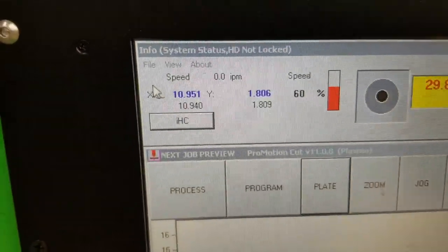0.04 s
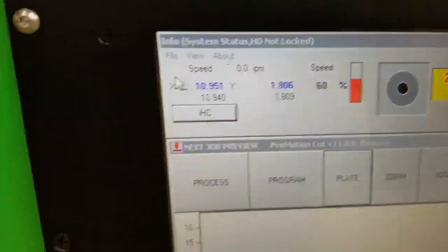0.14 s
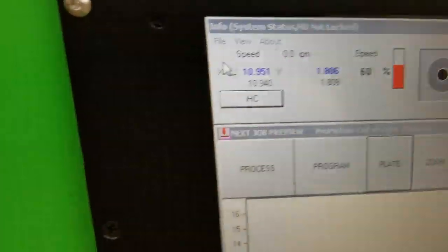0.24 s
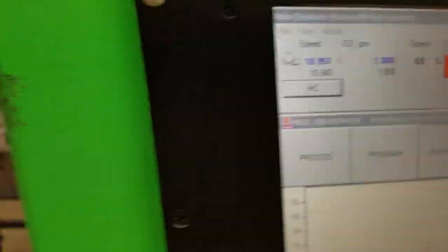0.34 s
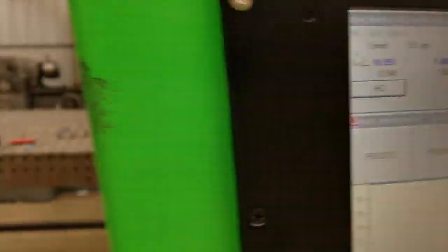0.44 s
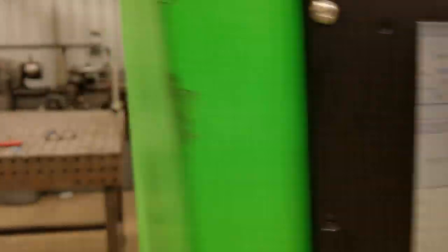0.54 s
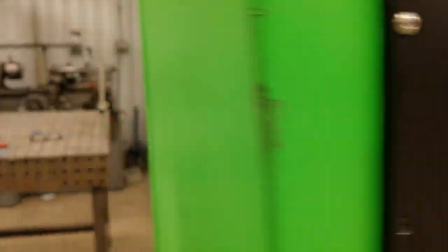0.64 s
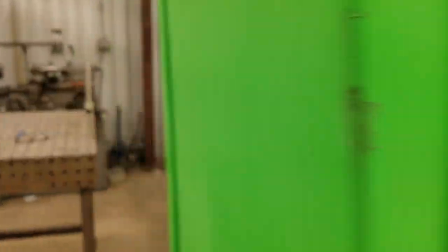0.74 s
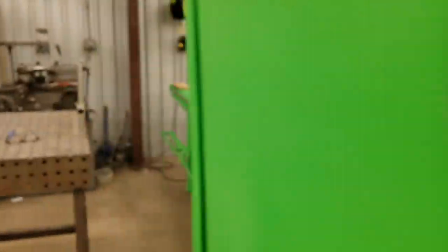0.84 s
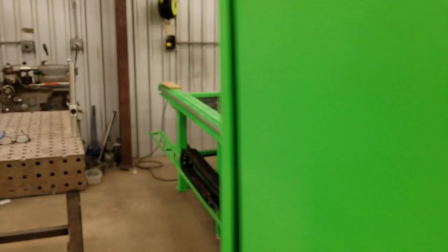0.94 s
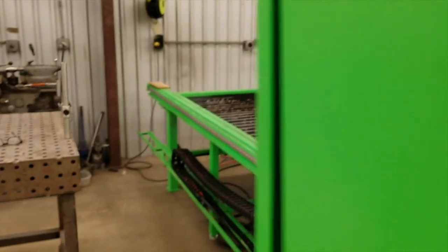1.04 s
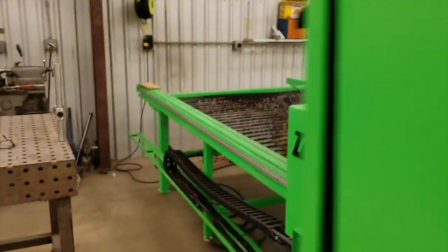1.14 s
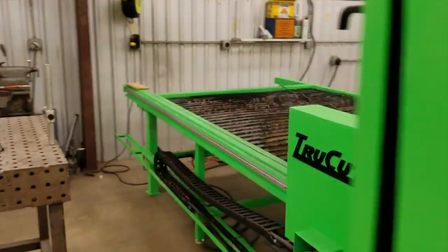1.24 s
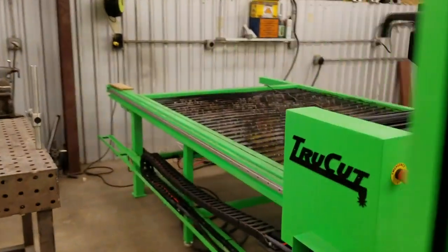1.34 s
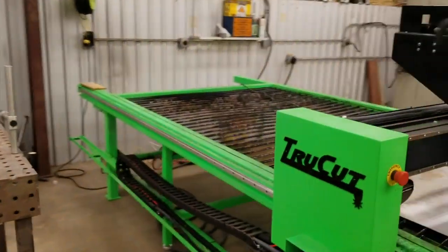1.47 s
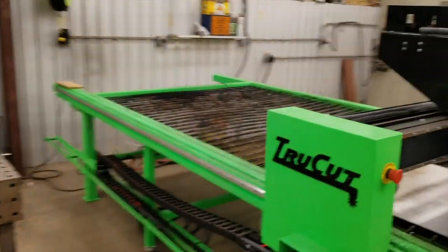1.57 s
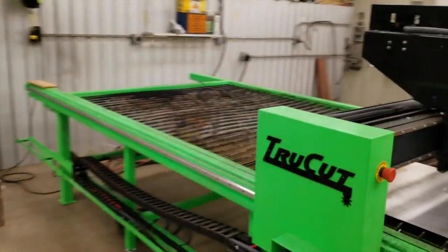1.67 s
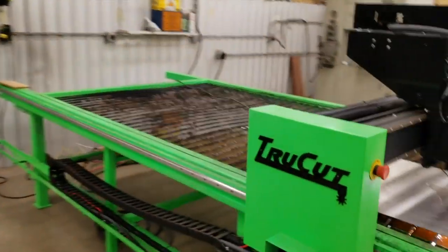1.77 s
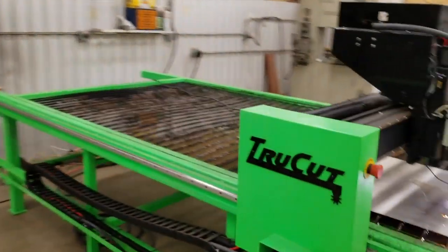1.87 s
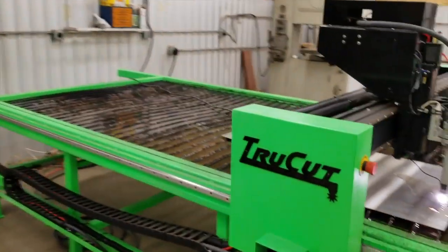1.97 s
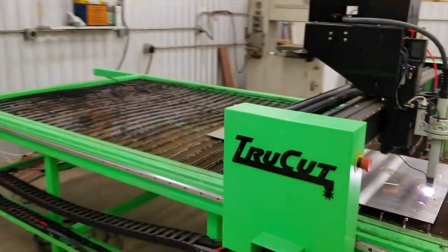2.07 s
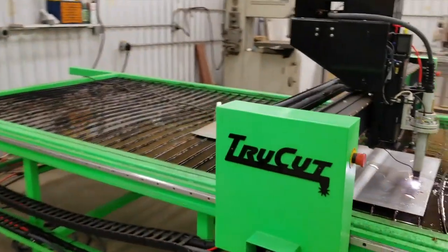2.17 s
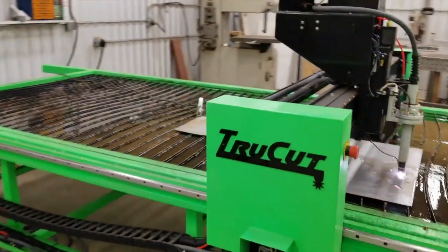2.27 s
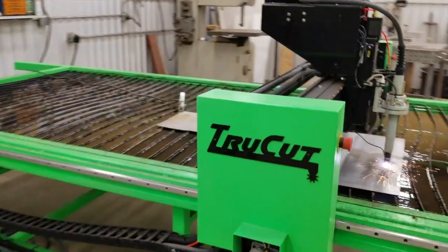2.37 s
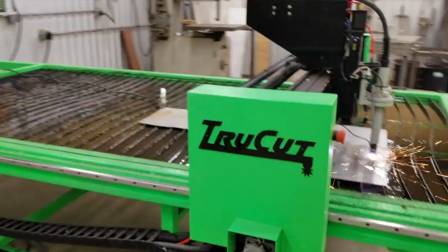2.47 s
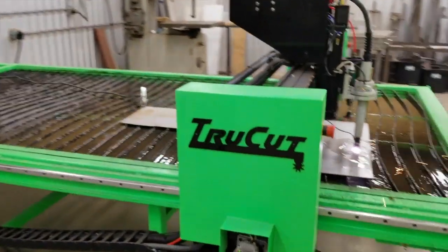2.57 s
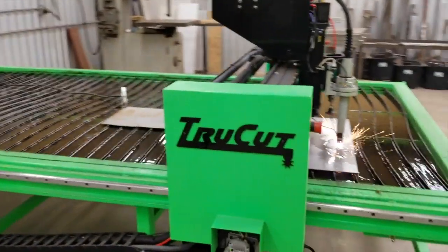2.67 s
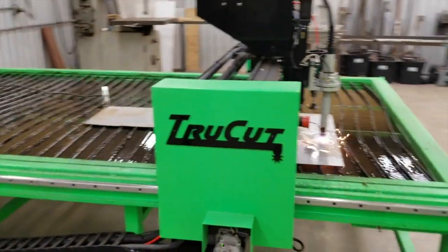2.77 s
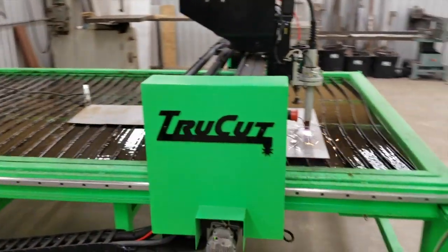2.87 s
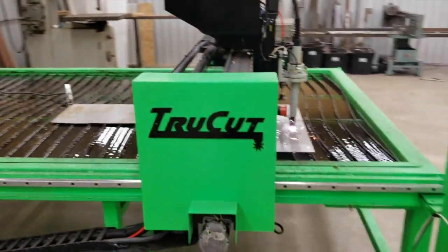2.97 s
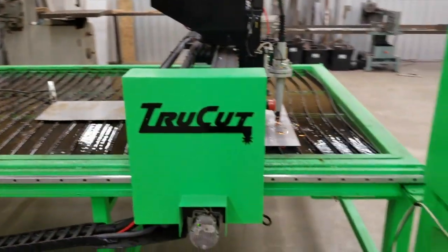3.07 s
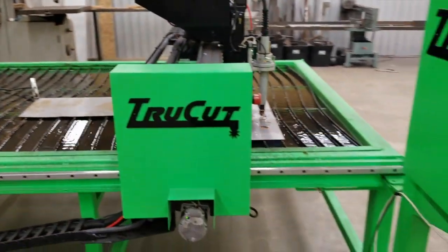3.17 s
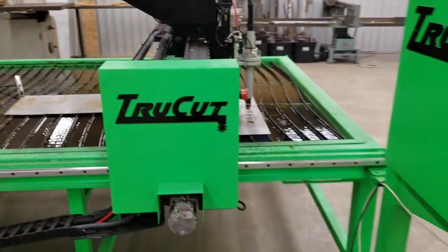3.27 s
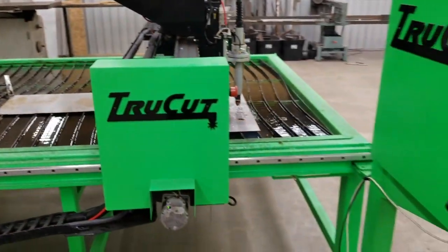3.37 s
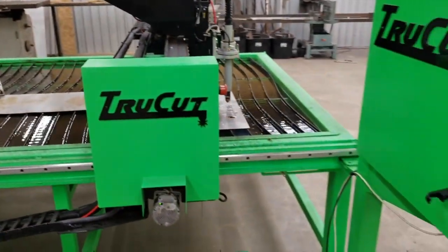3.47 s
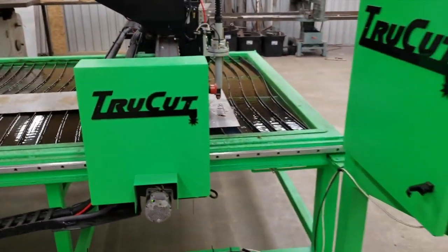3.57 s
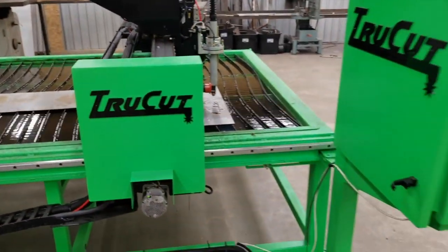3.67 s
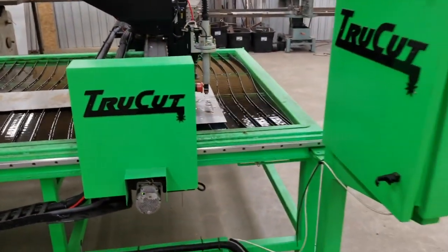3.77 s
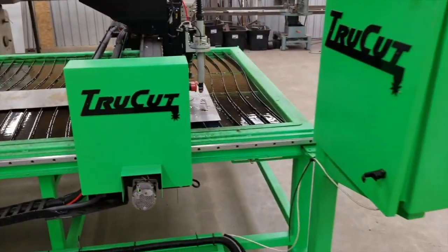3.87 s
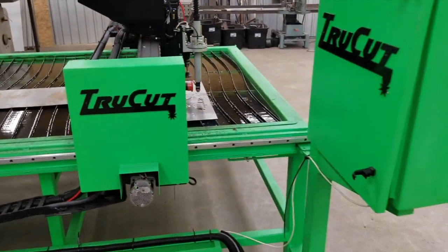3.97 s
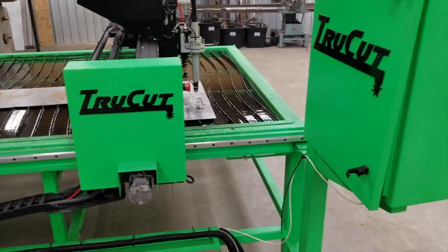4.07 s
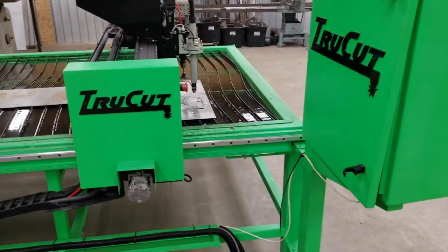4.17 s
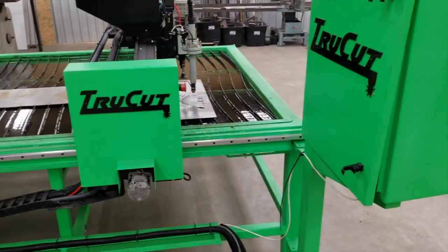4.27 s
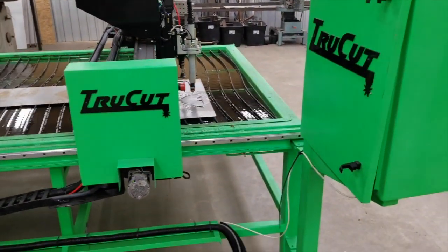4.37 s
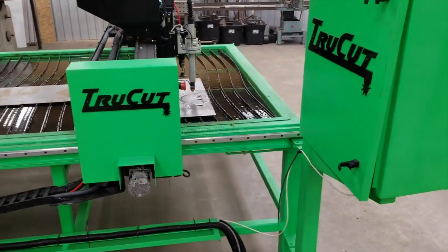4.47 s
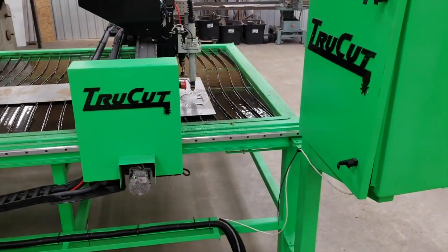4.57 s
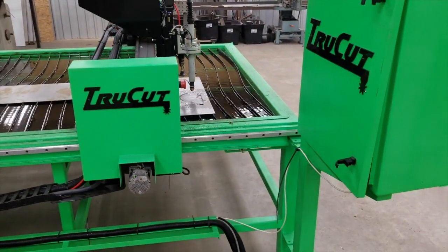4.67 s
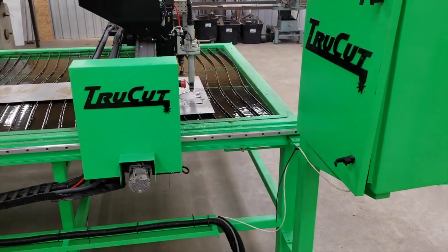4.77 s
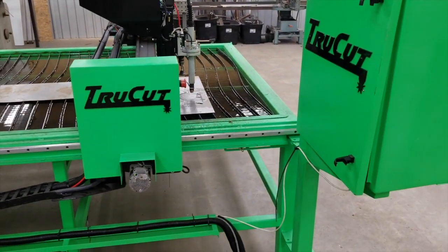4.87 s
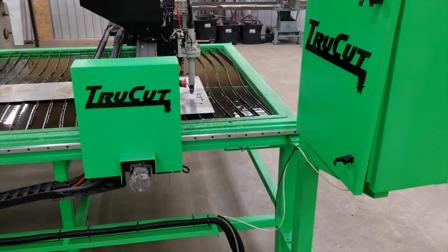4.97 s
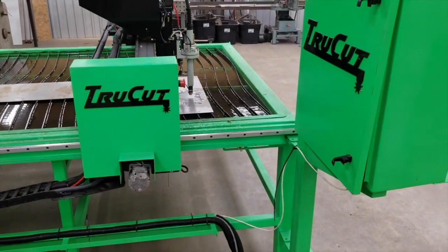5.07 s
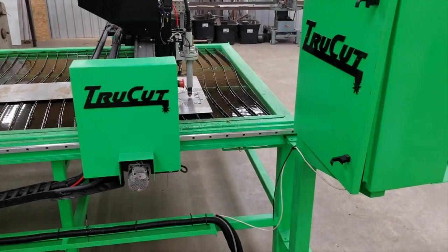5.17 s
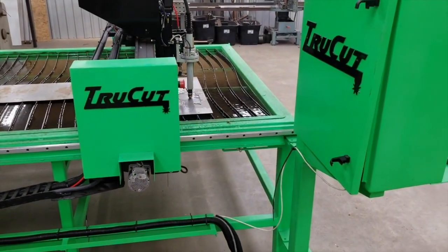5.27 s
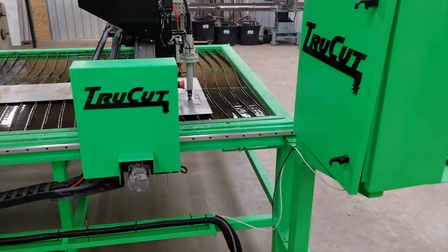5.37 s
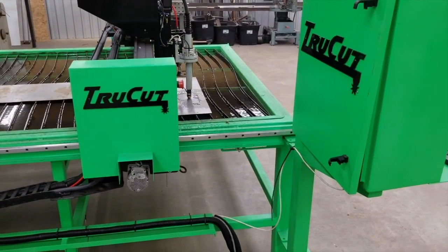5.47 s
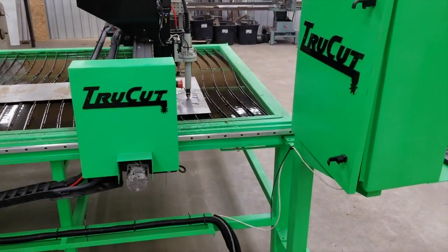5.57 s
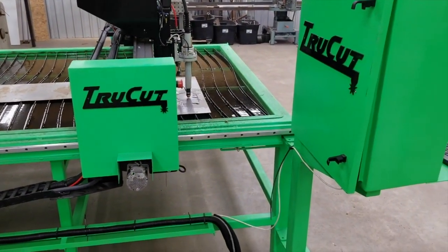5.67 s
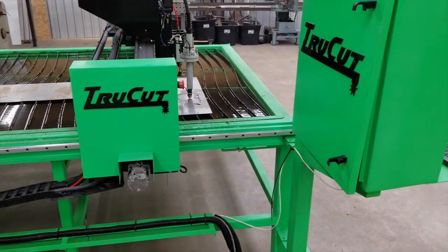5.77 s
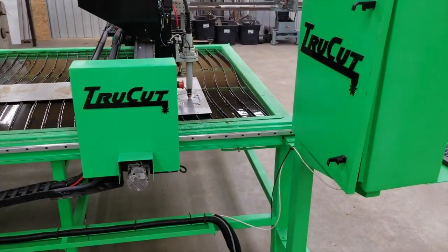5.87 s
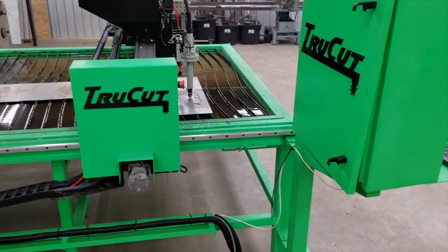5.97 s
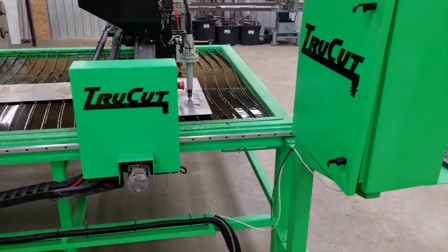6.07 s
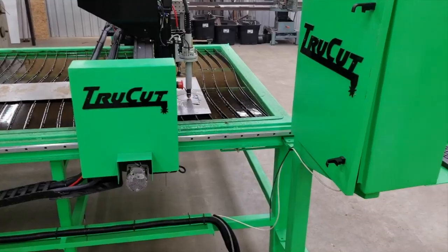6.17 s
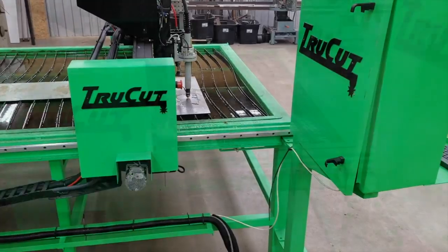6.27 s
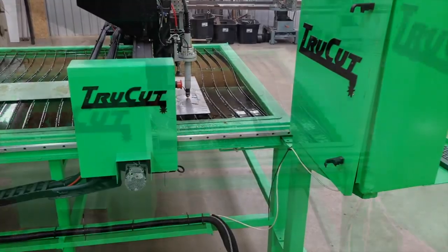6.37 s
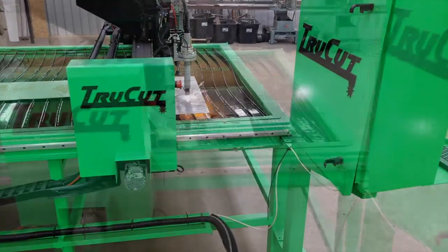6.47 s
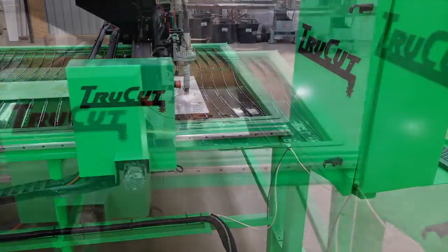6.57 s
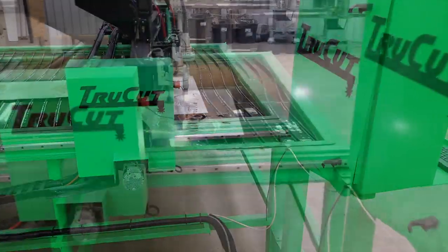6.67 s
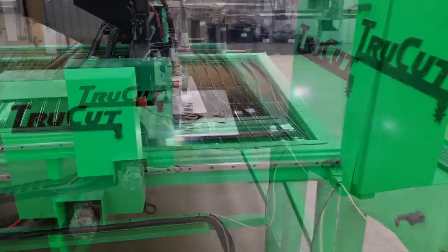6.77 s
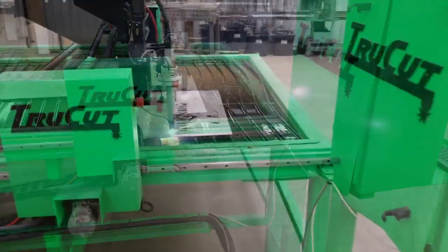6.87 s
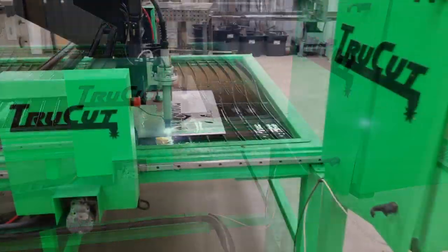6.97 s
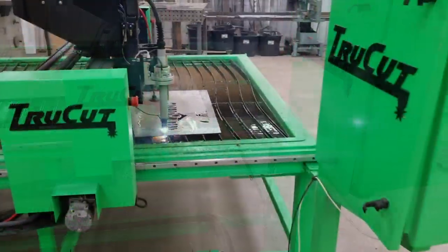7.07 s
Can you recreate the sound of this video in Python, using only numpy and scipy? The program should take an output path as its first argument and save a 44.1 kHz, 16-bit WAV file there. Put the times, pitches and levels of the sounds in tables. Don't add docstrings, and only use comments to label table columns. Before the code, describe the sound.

A handheld stereo microphone turns towards a cutting table a few metres off in a reflective metal shop. Torch hiss fades out, leaving humming fans; a brief gas puff and light snap restart it. Molten metal bursts into the water tray in rough surges, then the jet smooths out. After a second quick fade and pause, gas spurts and a hard double crack begins another sputtering rush.

```python
import sys
import numpy as np
from scipy import signal
from scipy.io import wavfile
from scipy.ndimage import uniform_filter1d, minimum_filter1d, map_coordinates

SR = 44100
rng = np.random.default_rng(int(sys.argv[2]) if len(sys.argv) > 2 else 0)


def ratio(d):
    e = np.asarray(d, float) / 20
    return 10 ** e


def digitize_waveform(pressure):
    field = np.atleast_2d(pressure).T
    bounded = np.clip(field, -1, 1)
    quanta = np.round(bounded * 32767).astype(np.int16)
    wavfile.write(sys.argv[1], SR, quanta)


N = 314414

# [from f/Hz, to f/Hz]
LAYER_SPANS = [
    (170, 430),
    (430, 950),
    (950, 2500),
    (2500, 4400),
    (4400, 6200),
    (6200, 9800),
    (9800, 16000),
]
# [t/s, splutter level/dB]
SPLUTTER = [(0, 0), (1.68, -0.5), (1.75, 1.5), (2.0, 1.5), (2.15, 2.5), (3.1, 2), (3.4, 0.9), (5.7, 0.83),
            (5.76, 0.7), (6.41, -1), (6.45, 1.5), (7.13, 1)]
# [t/s, level/dB]
BEAM = [(0, -1), (.5, 1.5), (.85, 3), (1.25, -9), (1.55, 0), (1.7, 5), (2.05, 2), (2.25, -3), (2.6, 3.5),
        (3.1, -3), (3.4, 0.5), (4.0, 1.5), (4.5, 4), (4.85, 1), (5.2, -1), (5.6, 4.5), (6.05, -10),
        (6.35, 2), (6.55, -3), (7.13, 4)]
# [f/Hz, left minus right level/dB]
PORT_LEAN = [(60, 0.0), (150, 0.5), (380, 0), (950, -0.5), (2380, -0.5), (5980, 0.5), (15000, -1.5)]


def torch():
    lifts = []
    for level, span in zip(layer_levels(), LAYER_SPANS):
        lifts.append(level - decibels(np.sum(ratio(torch_density(np.arange(*span))) ** 2)))
    centres = np.log(np.prod(LAYER_SPANS, axis=1)) / 2
    direct, walls, straight, around = arrivals()
    splutter_db, = in_time(SPLUTTER)
    beam_db, = in_time(BEAM)
    whole, near = puffs(per_s=49, fade_s=0.024), drift(16)
    out, edges = 0, 150 * 2 ** np.arange(0, 7, 1 / 4)
    for k, (low, high) in enumerate(zip(edges, edges[1:])):
        hz = np.sqrt(low * high)
        place = np.interp(np.log(hz), centres, np.arange(len(LAYER_SPANS)))
        below = min(int(place), len(LAYER_SPANS) - 2)
        lift = lifts[below] + (place - below) * (lifts[below + 1] - lifts[below])
        near = 0.8 * near + 0.24 * drift(61)
        from_jet = int(hz > 2400)
        path = from_jet + int(hz >= 6000)
        noise = straight[path] * direct[path][k % 2]
        noise = noise + around[path] * diffuse(walls[k % 2][from_jet], hz)
        level = torch_density(hz) + lift + splutter_db * (0.85 * whole + 2.0 * near)
        level = level + (hz > 13500) * beam_db
        out = out + band(noise, low, high) * ratio(level) * left_right(at_hz(PORT_LEAN, hz))
    out = tints(cavities(turning(out)))
    return gouts(slops(out)) * np.sqrt(SR / 2) * ratio(1.15)


# [t/s, hiss level/dB]
JET = [
    [(0, -25), (.45, -25.5), (1.04, -26.5)],
    [(1.69, -24), (2.2, -24), (2.3, -21), (2.37, -19.5), (2.53, -17.5), (2.63, -23.5), (3.05, -28),
     (3.6, -32), (3.82, -28.5), (4.9, -24), (5.0, -26), (5.74, -25)],
    [(6.424, -22), (6.626, -28), (7.13, -25.5)],
]
# [t/s, roar level/dB, blow-through into the tray level/dB]
CUT = [
    [(0, -24, -15), (1.04, -37, -15.5)],
    [(1.69, -30, -21), (1.85, -23, -20), (1.9, -28.5, -6), (2.3, -29.5, -2), (2.4, -25, -13.5),
     (2.8, -29, -10), (3.05, -41, -3.5), (3.2, -36, -17.5), (3.94, -24.5, -12.5), (4.34, -31.5, -18.5),
     (4.8, -35, -8), (5.74, -35.5, -15)],
    [(6.424, -27.5, -19.5), (6.6, -26, -22), (6.7, -30, -6), (7.13, -27.5, -15)],
]
# [level/dB re its control, share of jet 0-1, share of blow-through, share of the fall, pre-
# flow level/dB re the common pre-flow ramp]
VOICING = [
    (-15, 0.36, 0.6, 0.52, -30),
    (-0.36, 0, 1, 0.15, -13.5),
    (-3, 0, 0.16, 0.79, -20),
    (-3.5, 0.2, -0.071, 0.47, -13.5),
    (-4, 0.69, -0.084, 0.73, -5.5),
    (-4, 0.97, -0.082, 0.8, -4.5),
    (1.86, 0.94, -0.0018, 1.1, -4.5),
]
# [gas shut t/s, gas reopened t/s, arc struck t/s, blast level/dB]
VALVES = [
    (1.037, 1.563, 1.687, -4.5),
    (5.741, 6.297, 6.4243, 5),
]


def layer_levels():
    fall_db_per_s, fall_db_per_s2 = 35.5, 69
    preflow_start_db, preflow_db_per_s, open_s = -44, 108, .012
    arc_out_db, arc_out_s = 2, 0.049
    blast_s = 0.016
    t = np.arange(N) / SR
    jet, = in_time(np.vstack(JET))
    roar, through = in_time(np.vstack(CUT))
    levels = []
    for db, jet_share, through_share, fall_share, preflow_db in VOICING:
        level = db + jet_share * jet + (1 - jet_share) * roar + through_share * through
        for shut, opened, struck, blast_db in VALVES:
            off = slice(round(shut * SR), round(struck * SR))
            since, flowing = t[off] - shut, t[off] - opened
            dying = level[off.start] - fall_share * (fall_db_per_s * since + fall_db_per_s2 * since ** 2)
            dying -= (1 - jet_share) * arc_out_db * (1 - np.exp(-since / arc_out_s))
            preflow = ratio(preflow_start_db + preflow_db + preflow_db_per_s * flowing)
            preflow = preflow * np.clip(flowing / open_s, 0, 1)
            level[off] = decibels(ratio(dying) ** 2 + preflow ** 2)
            level[off.stop:] += jet_share * blast_db * np.exp((struck - t[off.stop:]) / blast_s)
        levels.append(level)
    return levels


# [f/Hz, density level/dB per Hz]
TORCH_HISS = [(94, -64), (160, -34), (653, -9), (924, -11.5), (1410, -1.5), (1580, -6), (1880, -2.5),
              (2470, -1.5), (3490, 2), (6470, -8), (8000, -4.5), (9150, -2.5), (11100, -2), (13200, 5),
              (16000, -7)]
# [f/Hz, density level/dB per Hz]
BOIL = [(71, -57), (120, -36), (227, -14.5), (297, -11.5), (374, -8), (439, -8), (628, 3), (1300, 3),
        (1690, -40), (2860, -120)]


def torch_density(hz):
    boil = at_hz(BOIL, hz) + at_hz(TORCH_HISS, 1000) - at_hz(BOIL, 1000)
    return np.where(hz < 1000, boil, at_hz(TORCH_HISS, hz))


def puffs(per_s, fade_s):
    blown = (rng.random(N) < per_s / SR) * rng.exponential(1, N)
    fade, rise = np.exp(-1 / (fade_s * SR)), np.exp(-1 / (0.021 * SR))
    shape = np.sqrt(signal.lfilter([1], np.convolve([1, -fade], [1, -rise]), blown))
    return rms_one(shape - np.mean(shape))


# [t/s, right lag of the cut/ms, right lag of the jet/ms, direct share of cut 0-1,
# direct share of jet 0-1]
AIM = [(0, -.45, -.34, .65, .22), (.7, -.34, -.3, .5, .15), (1.2, .07, -.15, .2, .05),
       (1.68, -.16, -.18, .65, .38), (2.12, -.15, -.17, .55, .36), (2.24, -.1, -.02, .55, .1),
       (2.37, -.02, .115, .6, .6), (2.58, -.03, .185, .55, .55), (2.66, -.05, .2, .35, .2),
       (3.3, .02, .175, .6, .45), (3.8, .03, .18, .55, .3), (4.3, .02, .1, .65, .4), (5.1, 0, .07, .6, .5),
       (5.6, 0, .09, .55, .3), (6.0, .36, .17, .4, .1), (6.4, .36, .17, .4, .1),
       (6.43, .02, .052, .55, .45), (7.13, .02, .05, .25, .4)]


def arrivals():
    cut_lag, jet_lag, cut_share, jet_share = in_time(AIM)
    shares = np.clip([cut_share, (cut_share + jet_share) / 2, 0.73 * jet_share], 0, 1)
    sources = rng.standard_normal((2, N))
    from_cut = [at_ports(mono, cut_lag) for mono in sources]
    from_jet = [at_ports(mono, jet_lag) for mono in sources]
    facing = np.clip((np.arange(N) / SR - 3.0) * 10, 0, 1)
    body = [jet + facing * (cut - jet) for cut, jet in zip(from_cut, from_jet)]
    walls = [echoes(mono, spread_s=.006) for mono in sources]
    return [from_cut, body, from_jet], walls, np.sqrt(shares), np.sqrt(1 - shares)


STANDS = [.5, 1.9, 2.5, 3.1, 4.6, 6.7]


def echoes(mono, spread_s):
    cut_near, jet_near = .87, .76
    out, t = np.zeros((2, N)), np.arange(N) / SR
    for k in range(len(STANDS)):
        pattern = np.zeros((2, 2000))
        lags = np.minimum(20 + rng.exponential(spread_s * SR, (2, 14)), 1999).astype(int)
        np.put_along_axis(pattern, lags, rng.standard_normal(lags.shape), axis=1)
        pattern /= np.linalg.norm(pattern, axis=1, keepdims=True)
        here = np.sqrt(np.interp(t, STANDS, np.arange(len(STANDS)) == k))
        span = slice(*np.flatnonzero(here)[[0, -1]])
        heard = signal.oaconvolve(mono[None, span], pattern)[:, :span.stop - span.start]
        out[:, span] += here[span] * heard
    wash = rng.standard_normal((2, N))
    return [np.sqrt(share) * out + np.sqrt(1 - share) * wash for share in (cut_near, jet_near)]


# [t/s, left minus right level/dB]
TURN = [(0, -0.5), (1.0, .6), (1.8, 1), (2.4, 0.5), (3.1, -0.5), (4.0, 0.3), (5.0, -0.2), (6.2, -0.8),
        (7.13, 0)]


def turning(x):
    return x * left_right(in_time(TURN)[0])


# [from t/s, to t/s, f/Hz, width f/Hz, lift level/dB]
CAVITIES = [(-.1, 0.6, 1780, 135, 7), (1.9, 2.33, 245, 230, 4.5), (-.1, 1.26, 371, 37, 11.5),
            (1.88, 2.73, 640, 82, 4), (2.55, 3.1, 990, 34, 6.5), (3.54, 3.85, 1850, 210, 7.5),
            (3.72, 4.12, 1080, 54, 2.5), (3.8, 4.08, 2460, 31, 9), (3.2, 3.7, 5020, 620, 4),
            (4.5, 5.85, 5340, 432, -1), (3.9, 4.3, 1590, 270, 0), (6.42, 6.5, 5500, 380, 6),
            (5.5, 6.7, 11140, 410, 5), (5, 6.4, 254, 53, 5), (5.2, 5.8, 2480, 120, -1.5),
            (6.41, 6.56, 11000, 300, 7), (2.84, 3.4, 260, 220, 5), (6.65, 6.83, 470, 130, 6.5),
            (4.2, 4.4, 235, 33, 15), (5.0, 5.7, 384, 46, 6), (6.5, 7.0, 1107, 45, 10),
            (6.95, 7.2, 740, 260, 5), (2.0, 2.45, 6500, 140, -9), (1.69, 2.3, 13100, 4800, -3.5)]


def cavities(x):
    out = x.copy()
    for start, end, hz, width, db in CAVITIES:
        on, span = passing(start, end, edge_s=0.16)
        out[:, span] += ratio(db + 2.2 * drift(7)[span]) * on * resonance(x[:, span], hz, width)
    return out


# [from t/s, to t/s, f/Hz, width
# f/Hz, change level/dB]
TINTS = [(.4, 0.85, 2740, 850, -3.5), (.8, 1.1, 1700, 820, 5), (0, 0.96, 4300, 1700, 2),
         (1.72, 2.13, 4600, 1000, -7.5), (1.7, 2.03, 12200, 3300, -4.5), (1.9, 2.21, 5100, 1800, 4.5),
         (2.3, 2.68, 1360, 850, -6.5), (2.78, 2.86, 2000, 860, 5.5), (2.88, 3.05, 2100, 700, 4),
         (2.7, 3.0, 10300, 4000, 2.5), (3.2, 3.5, 8400, 2100, 4.5), (3.5, 8.7, 4330, 330, 1),
         (4.15, 4.7, 2630, 1700, -3.5), (3.7, 3.9, 7000, 3000, 0), (4, 5.7, 630, 340, -1.5),
         (4.3, 4.9, 1170, 330, 5), (4.92, 5.5, 11000, 1300, 4.5), (5.05, 5.55, 5500, 1300, -2.5),
         (5.3, 6.4, 1130, 790, -3), (5.85, 6.15, 5700, 3000, 3), (6.15, 6.3, 2900, 9800, -6.5),
         (1.35, 1.6, 5500, 3500, -4.5), (6.6, 6.7, 3500, 1500, -7.5), (6.85, 7.2, 3300, 610, 2),
         (6.9, 7.2, 4200, 1200, -5.5), (6.5, 7.2, 400, 200, -1), (6.3, 6.6, 9500, 1600, -2.5),
         (1.56, 1.66, 2900, 2500, 0), (6.3, 6.39, 3000, 2500, -1), (1.9, 2.15, 2150, 510, 3),
         (6.58, 6.85, 1030, 310, 4), (3.85, 4.2, 370, 120, -9), (2.3, 2.45, 214, 80, -7),
         (0, 0.56, 520, 190, 3.5), (3.1, 4.1, 290, 74, 4.5), (1.5, 4.2, 1058, 52, 5.5),
         (4.7, 4.9, 14800, 1200, -2), (4.95, 5.27, 6500, 390, -2), (4.4, 4.8, 12500, 1500, -3.5),
          (5.0, 5.45, 11100, 900, 2.5), (4.55, 5.0, 295, 100, 6.5), (2.15, 2.3, 12500, 3000, 0),
          (2.33, 2.42, 13000, 2500, 1), (1.2, 1.5, 1600, 900, -3), (3.45, 3.66, 6000, 600, -11),
          (4.3, 4.85, 3050, 400, -5), (2.68, 3.0, 5900, 540, -5), (0, 0.39, 7300, 900, -4),
          (.55, 0.94, 9600, 900, -5), (3.1, 4.1, 7300, 550, -1), (6.45, 6.68, 9800, 900, -5),
          (6.93, 7.05, 9200, 700, -6), (6.4, 6.7, 14800, 1500, -2.5), (5.7, 6.25, 14500, 2000, -4),
          (1.1, 1.45, 14500, 2000, -6), (4.4, 4.9, 7200, 370, -3), (6.75, 7.2, 6700, 1800, 3),
          (4.5, 6.4, 243, 30, 4), (1.2, 1.7, 900, 60, 4), (5.8, 6.4, 900, 60, 3),
          (3.1, 3.45, 3000, 500, -3.5), (2.62, 2.8, 1800, 700, 2.5), (4.05, 4.3, 7700, 2500, -2.5),
          (.7, 1.3, 1000, 280, 2), (1.9, 2.12, 3100, 600, 2), (2.38, 2.47, 3800, 500, -3),
          (2.47, 2.58, 3000, 500, -4), (4.3, 4.7, 5300, 900, 2), (3.6, 3.9, 1600, 400, 2),
          (0, 1.2, 800, 43, -5), (1.7, 1.95, 8700, 1500, -3), (6.42, 6.5, 3400, 1500, -1)]


def tints(x):
    out = x.copy()
    for start, end, hz, width, db in TINTS:
        on, span = passing(start, end, edge_s=0.095)
        out[:, span] += (ratio(db * on) - 1) * resonance(out[:, span], hz, width)
    return out


# [t/s, colour f/Hz, lift level/dB, whole hiss swell
# (+) or dip (-) level/dB]
SLOPS = [(.93, 360, 11, 2), (1.74, 12200, -7, 1), (1.82, 1970, 5.5, 0.8), (2.06, 227, 8, -5),
         (2.27, 400, 6.5, -2.5), (2.5, 2300, 2, -2), (2.66, 1090, -13, -1), (2.79, 1100, -11, -0.5),
         (2.87, 550, 11.5, 1), (3.04, 380, 13, -2), (2.84, 600, 5, -1), (3.03, 2000, -8, 1),
         (2.11, 6000, -11, 0), (2.06, 1600, 2, 0.5), (3.72, 2450, -7, -1), (3.78, 1180, 0, -1),
         (2.655, 1100, -5, 0), (2.775, 1080, 3.5, -2), (1.95, 790, 1.5, -2), (2.81, 3000, 2, -0.5),
         (2.955, 2480, 1, 0.5), (2.9, 3160, 3.5, -1.5), (2.07, 700, -26, 2.5), (3.66, 1910, -2, -2),
         (3.84, 4650, 1, -0.5), (3.95, 2500, -8, -2), (4.06, 2150, -6, -0.5), (4.11, 3300, -5, -0.5),
         (3.9, 694, 4.5, -0.5), (4.15, 1770, -10, -0.5), (5.04, 11000, -4, -1.5), (5.109, 7100, -5, -3),
         (5.2, 7050, -16, 1.5), (5.34, 7040, -17, 1), (5.42, 6950, -21, -2.5), (5.52, 7000, -19, 0.5),
         (5.59, 7000, -15, -0.5), (5.69, 8000, -1, 2.5), (6.47, 3000, -26, -3.5), (6.55, 1110, -5, -1.5),
         (6.76, 750, 8, 1), (6.95, 700, -11, 1)]


def slops(x):
    return swells(x, SLOPS, half_s=0.041)


# [t/s, colour f/Hz, lift level/dB, whole hiss swell
# (+) or dip (-) level/dB]
GOUTS = [(1.93, 2460, 9, 0), (2.01, 3180, 3, 1), (2.072, 1310, 9.5, 2), (2.167, 3300, 12.5, 1.5),
         (2.245, 2130, 8.5, 0), (2.29, 3000, -21, 0.5), (2.34, 2440, 8, 2.5), (2.372, 13000, 1, 2),
         (2.443, 6000, -20, -0.5), (2.635, 6000, -10, 0.5), (2.045, 3000, -20, -2), (1.84, 9000, -9, 0.5),
         (2.07, 704, -2, 2), (2.66, 1050, 3, 0), (2.83, 900, 0, 0), (6.745, 2510, -4, 0.5),
         (6.69, 3000, -20, -0.5), (6.9, 3000, -20, -1.5), (2.41, 5300, 6, 6), (2.47, 9000, -11, 15),
         (2.522, 4700, 5.5, 0), (2.599, 4950, 7.5, -2.5), (2.69, 1210, -3, 2), (2.741, 3000, -25, -4.5),
         (2.79, 1990, -10, -1), (2.87, 6000, -21, -5), (2.93, 3000, -4, -0.5), (2.98, 6000, -13, 0),
         (3.49, 4800, 1.5, -1.5), (4.018, 1130, 4, -2), (5.05, 3000, -26, -2), (6.52, 4130, -12, 2),
         (6.58, 3200, -10, 2.5), (6.652, 5700, 10.5, 2), (6.77, 4800, -6, -1.5), (6.84, 3200, -6, 3.5),
         (7.01, 2400, -3, 1.5), (7.05, 1950, 3, 1), (7.09, 1550, 7, 1)]


def gouts(x):
    return swells(x, GOUTS, half_s=0.034)


def swells(x, rows, half_s):
    out, length = x.copy(), round(2 * half_s * SR)
    rise = 0.43
    shape = np.sin(np.pi / 2 * np.interp(np.arange(length) / length, [0, rise, 1], [0, 1, 0])) ** 2
    for s, hz, db, whole_db in rows:
        start = round(s * SR - rise * length)
        span, bump = slice(start, start + length), shape[:N - start]
        out[:, span] += ratio(db) * bump * resonance(x[:, span], hz, 0.28 * hz)
        out[:, span] += (ratio(whole_db * bump) - 1) * x[:, span]
    return out


# [t/s, peak level/dB]
STRIKES = [
    (1.6861, -4),
    (1.6994, -12),
    (6.4205, 0),
    (6.4252, -6),
    (6.4382, -7),
    (1.7045, -14),
    (6.4228, -15),
    (6.446, -9),
]
# [f/Hz, width f/Hz, level/dB]
PORT_RING = [
    (5200, 1200, -6),
    (11300, 900, 1.5),
    (13400, 1400, 0),
    (2600, 2200, -9),
    (15900, 1500, -3),
    (8200, 1500, -9),
]


def strikes():
    pop_hz, pop_width_hz, pop_db, pop_lead_s = 2800, 2600, -16, .0008
    out, tail = np.zeros(N), np.arange(400)
    shape = tail * np.exp(-tail / SR / .0004)
    for (s, peak_db), noise in zip(STRIKES, rng.standard_normal((len(STRIKES), len(tail)))):
        rung = 0
        for k, (hz, width, db) in enumerate(PORT_RING):
            rung = rung + ratio(db) * resonance(noise * shape, hz, width) * (-1) ** k
        out[round(s * SR) + tail] += ratio(peak_db) * rung / np.abs(rung).max()
        pop = resonance(np.diff(shape, prepend=0), pop_hz, pop_width_hz)
        pop = resonance(pop, pop_hz, pop_width_hz)
        out[round((s - pop_lead_s) * SR) + tail] += ratio(peak_db + pop_db) * pop / np.abs(pop).max()
    return at_ports(out, .088)


# [f/Hz, density level/dB per Hz]
FANS = [(15, -57), (25, -25), (108, -7.5), (249, -5), (285, -12), (416, -6.5), (489, -15), (545, -3),
        (591, -20), (796, -3), (887, -15), (962, -27), (1040, -15), (4870, -31.5), (16000, -88)]
# [f/Hz, width f/Hz, level/dB]
MOTOR = [
    (121, 11, -10),
    (232, 122, -3.5),
    (799, 13.4, -3),
    (909, 9.6, -20),
    (1610, 25, -18),
    (2036, 45, -19),
]
# [f/Hz, level/dB re fans]
WHINE = [
    (242, -8),
    (802, -13),
]
# [t/s, level/dB]
SHOP_GAIN = [
    (0.0, -53.5),
    (1.43, -54.5),
    (2.58, -69.5),
    (4.63, -58),
    (6.87, -58),
    (6.91, -60),
    (7.13, -61),
]


def shop():
    walls, edges = rng.standard_normal((2, 2, N)), 25 * 2 ** np.r_[0:6:1 / 3, 6:9.6:2 / 3]
    fans, hums, tones = 0, 0, 0
    for k, hz in enumerate(np.sqrt(edges[1:] * edges[:-1])):
        fans = fans + ratio(at_hz(FANS, hz)) * band(diffuse(walls[k % 2], hz), *edges[k:k + 2])
    for hz, width, db in MOTOR:
        hum = resonance(resonance(diffuse(walls[0], hz), hz, width), hz, width)
        hums = hums + ratio(db) * rms_one(hum)
    for hz, db in WHINE:
        tones = tones + ratio(db) * np.sin(2 * np.pi * hz * np.arange(N) / SR)
    return ratio(in_time(SHOP_GAIN)[0] + 7.5) * (rms_one(fans) + hums + tones)


def at_ports(mono, lag_ms):
    shift = lag_ms * SR / 2000
    times = [np.arange(N) + side * shift for side in (1, -1)]
    return np.array([map_coordinates(mono, [when], order=3, mode="mirror") for when in times])


def diffuse(noises, hz):
    gap_m = 0.161
    alike = .97 * np.sinc(2 * hz * gap_m / 343)
    return np.sqrt((1 + alike) / 2) * noises[0] + np.sqrt((1 - alike) / 2) * noises[1] * [[1], [-1]]


def left_right(db):
    return ratio(db / 2 * np.array([[1], [-1]]))


def passing(start, end, edge_s):
    t = np.arange(N) / SR
    on = np.clip(np.minimum(t - start, end - t) / edge_s + .5, 0, 1)
    span = slice(*np.flatnonzero(on)[[0, -1]])
    return on[span], span


def decibels(power):
    return 10 * np.log10(power)


def in_time(rows):
    s, *columns = np.transpose(rows)
    return [np.interp(np.arange(N) / SR, s, c) for c in columns]


def at_hz(points, hz):
    f, db = np.transpose(points)
    return np.interp(np.log(hz), np.log(f), db)


def rms_one(x):
    return x / np.sqrt(np.mean(x ** 2) + 1e-20)


def drift(rate):
    r = np.exp(-80 * np.pi * rate / SR)
    slow = signal.lfilter([1], [1, -2 * r, r * r], rng.standard_normal(N // 40 + 2002))[2000:]
    return np.interp(np.arange(N) / 40, np.arange(len(slow)), rms_one(slow))


def band(x, low, high):
    return signal.sosfilt(signal.butter(2, [low, high], "band", fs=SR, output="sos"), x)


def resonance(x, hz, width):
    r = np.exp(-np.pi * width / SR)
    poles = [1, -2 * r * np.cos(2 * np.pi * hz / SR), r * r]
    return signal.lfilter(np.array([1, 0, -1]) * (1 - r * r) / 2, poles, x)


def limiter(x):
    ceiling = .72
    needed = np.minimum(1, ceiling / (np.abs(x).max(axis=0) + 1e-9))
    return x * uniform_filter1d(minimum_filter1d(needed, size=133), size=67)


def scene():
    top_cut = signal.ellip(12, .3, 55, 15720, fs=SR, output="sos")
    hiss = torch()
    cracks = strikes()
    return limiter(signal.sosfilt(top_cut, hiss + shop())) + cracks


def band_limit(x):
    return signal.sosfilt(signal.butter(12, 16270, fs=SR, output="sos"), x)


def record(dry):
    mix = np.clip(dry, -.98, .98)
    return band_limit(mix)


dry = scene()
out = record(dry)
digitize_waveform(out)
```